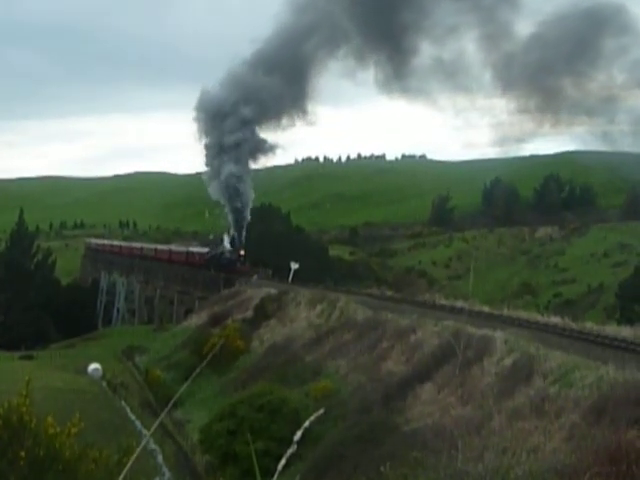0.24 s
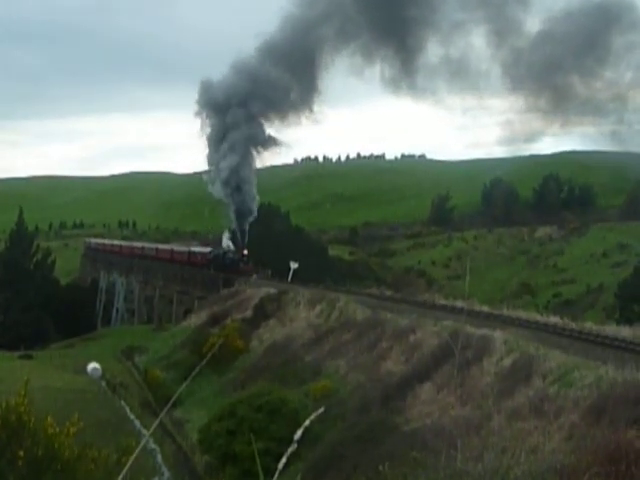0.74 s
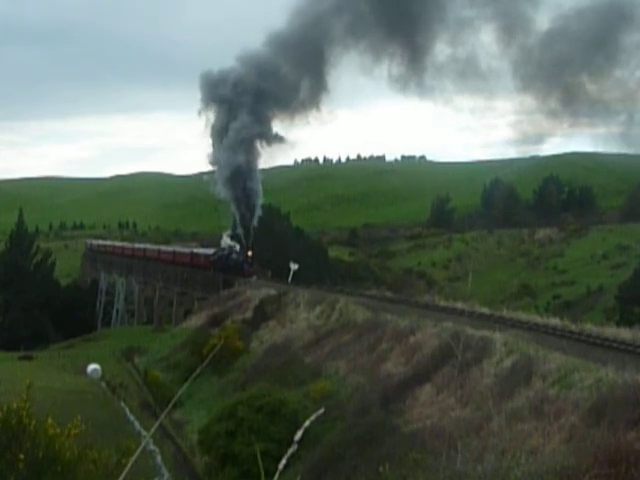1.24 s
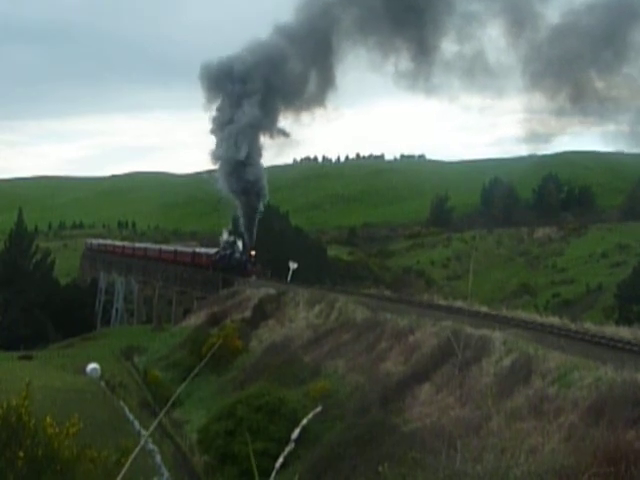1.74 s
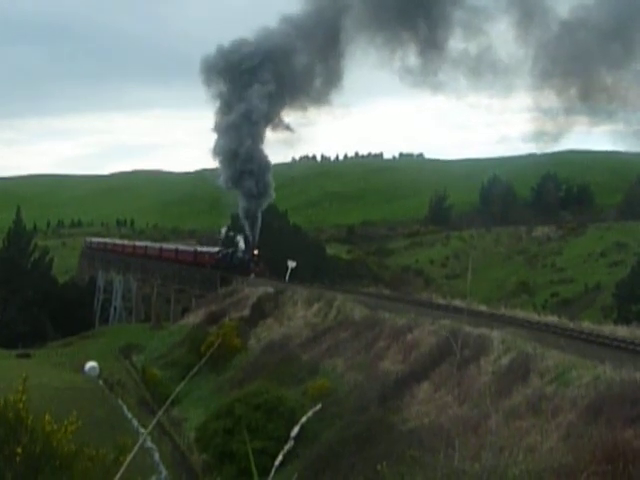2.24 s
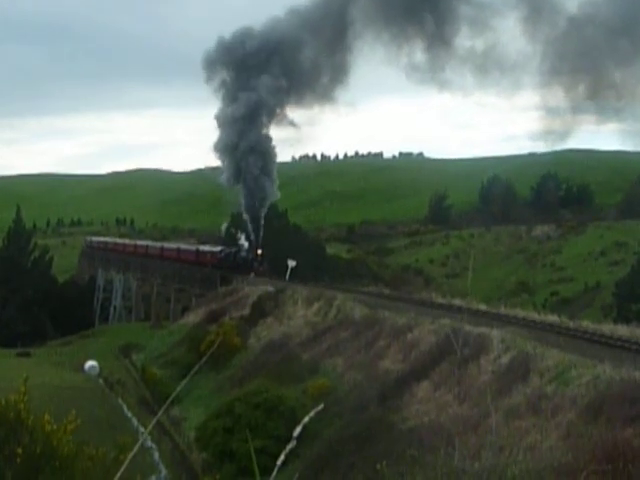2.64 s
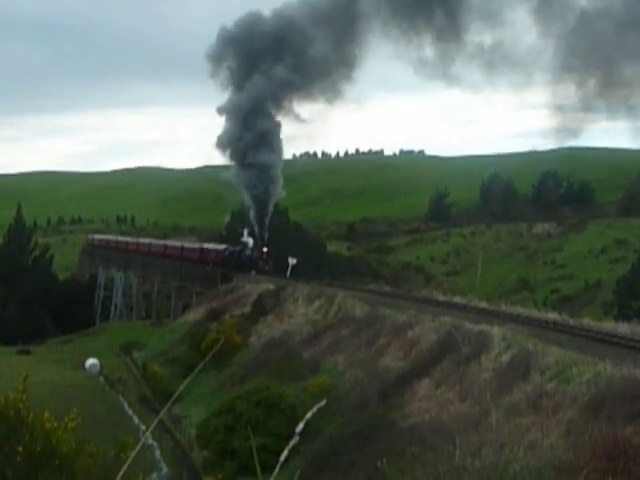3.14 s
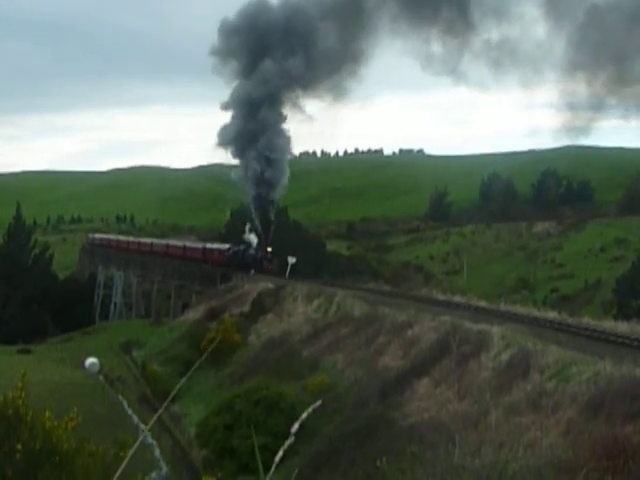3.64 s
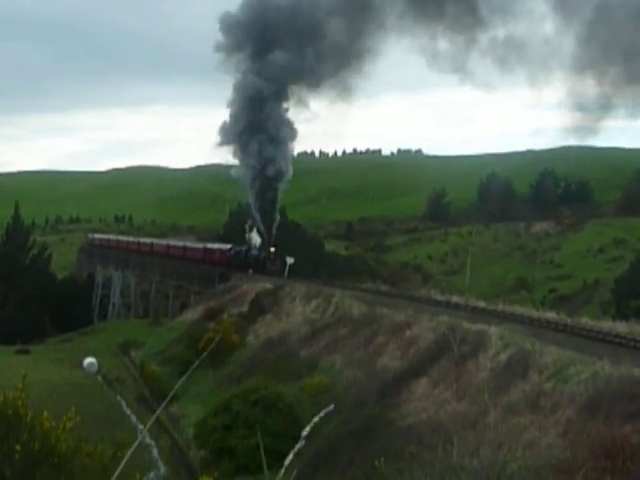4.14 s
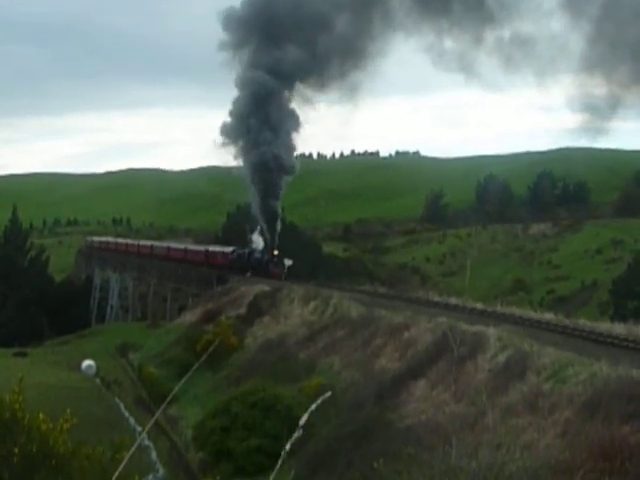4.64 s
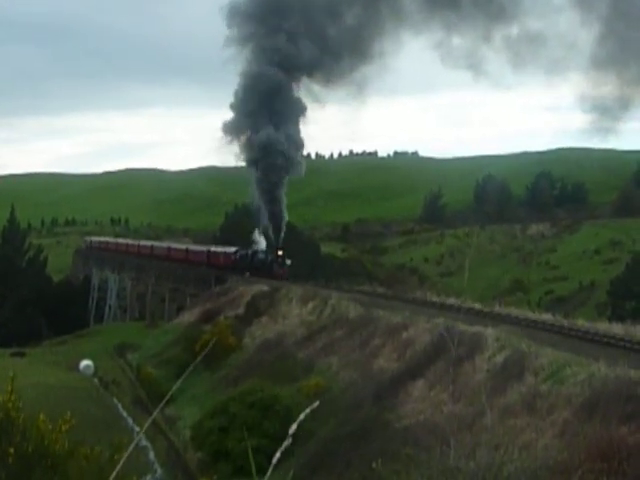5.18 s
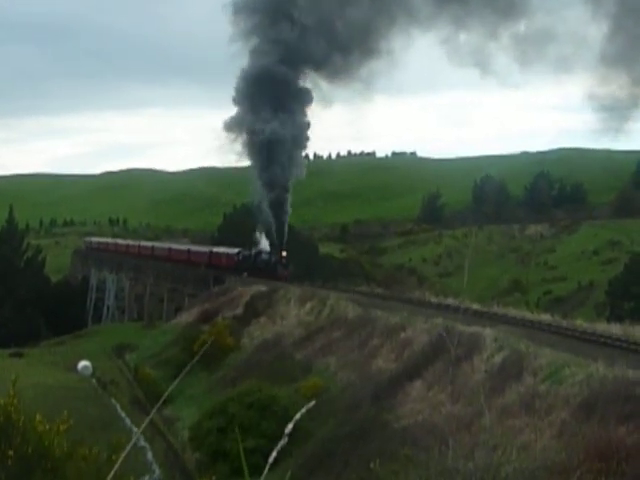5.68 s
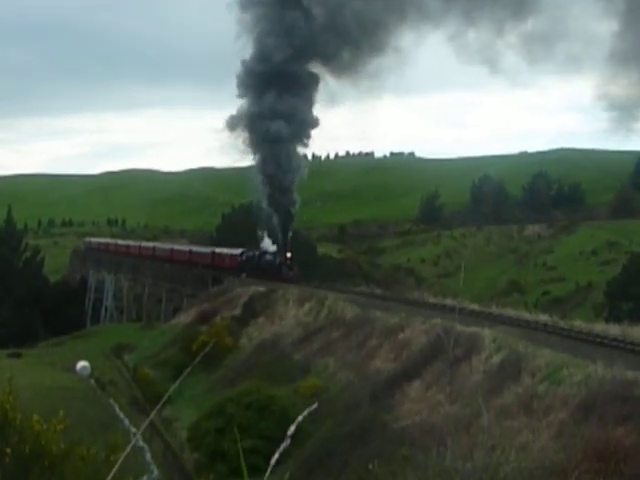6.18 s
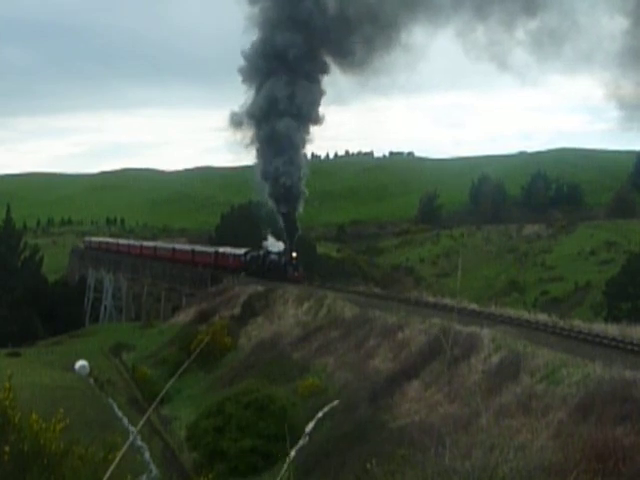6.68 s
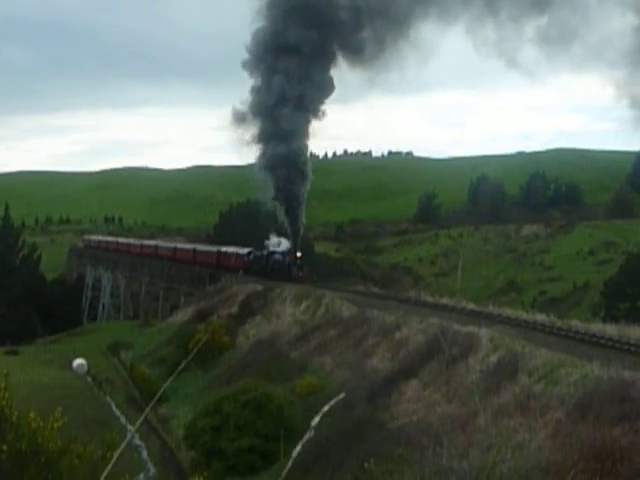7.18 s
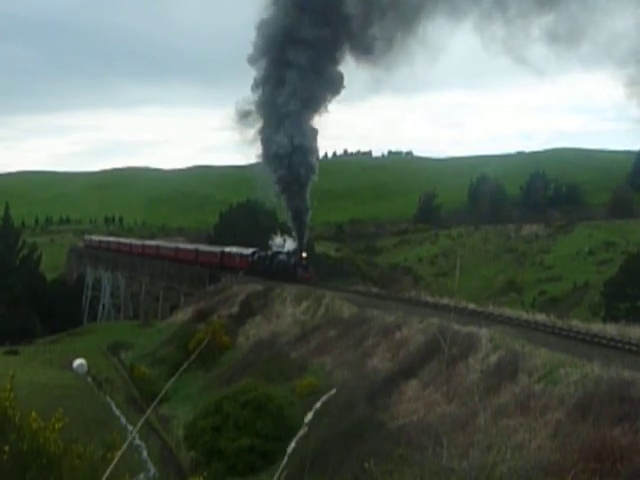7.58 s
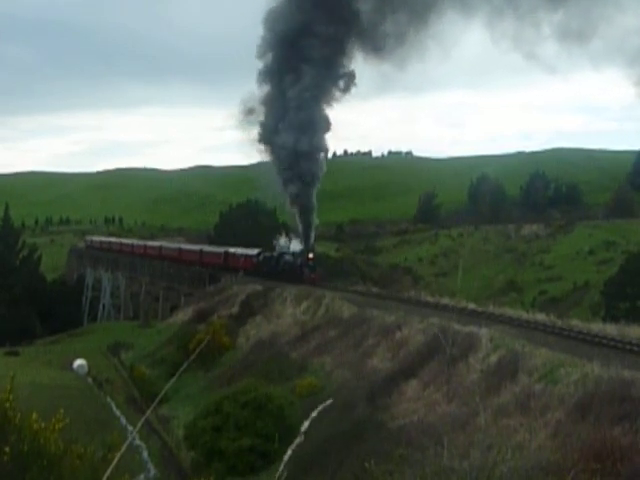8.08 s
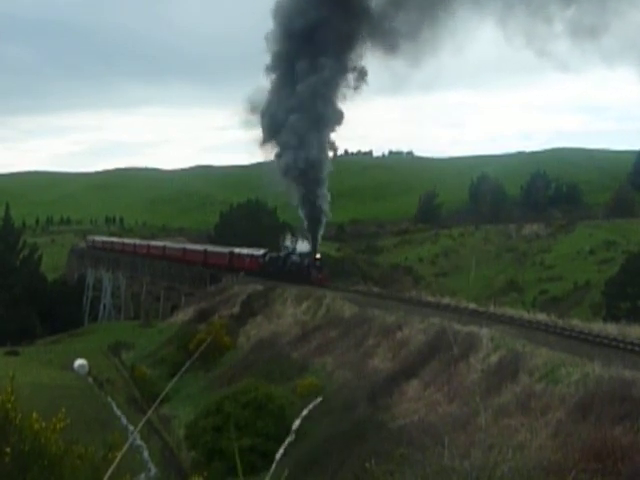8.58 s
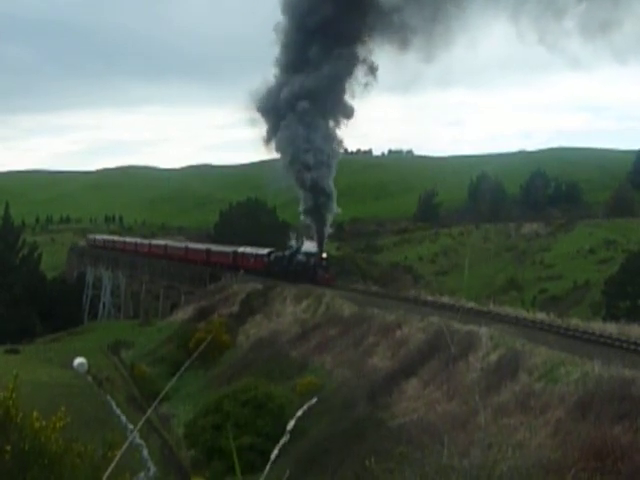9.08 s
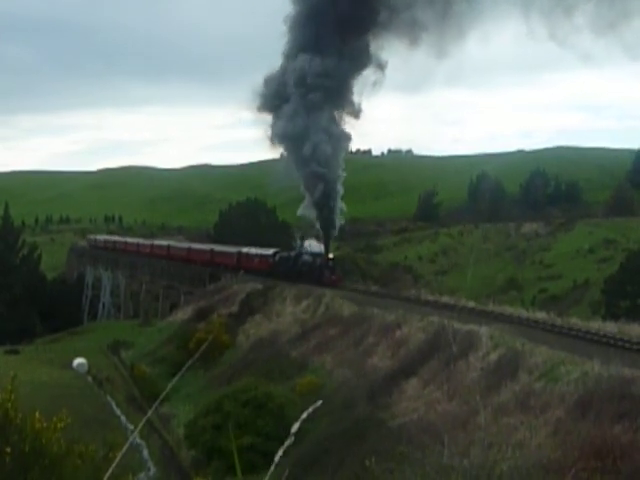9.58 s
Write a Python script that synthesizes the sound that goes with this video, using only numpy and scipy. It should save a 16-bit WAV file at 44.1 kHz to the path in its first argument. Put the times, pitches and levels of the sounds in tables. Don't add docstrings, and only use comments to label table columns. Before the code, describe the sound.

Quick, even, boomy steam exhaust beats from a train working uphill, with soft valley echo, deep wheel rumble, light hiss and a few camera ticks.

```python
import sys
import numpy as np
from scipy import signal
from scipy.fft import rfft, irfft, next_fast_len
from scipy.io import wavfile
from scipy.ndimage import uniform_filter1d

SR = 44100
rng = np.random.default_rng(int(sys.argv[2]) if len(sys.argv) > 2 else 0)


def volts(x):
    e = np.asarray(x, float) / 20
    return 10 ** e


def transcribe(signal):
    frames = np.atleast_2d(signal).T
    limited = np.clip(frames, -1, 1)
    pcm = np.round(limited * 32767).astype(np.int16)
    wavfile.write(sys.argv[1], SR, pcm)


N = 433062

# start_s, roar_db, dryness_db, valve_open_s
EXHAUST_BEATS = [(-0.015, -26, -17, .045), (.402, -28.5, -17.5, 0.079), (.842, -27.5, -27, 0.091),
                 (1.271, -30, -21, 0.085), (1.707, -30.5, -19.5, 0.088), (2.141, -28, -11.5, 0.062),
                 (2.583, -27.5, -17, 0.084), (3.004, -26, -22, 0.073), (3.436, -28.5, -21, .1),
                 (3.85, -26.5, -23.5, 0.06), (4.269, -30.5, -16.5, 0.097), (4.672, -28.5, -20, 0.074),
                 (5.086, -27.5, -17.5, 0.073), (5.474, -32, -15, 0.093), (5.88, -30.5, -16, 0.08),
                 (6.264, -29, -19.5, .085), (6.649, -29, -18, .068), (7.031, -28.5, -19.5, 0.079),
                 (7.429, -27.5, -17.5, 0.068), (7.819, -29, -11.5, 0.078), (8.224, -29, -18.5, 0.077),
                 (8.627, -30, -18.5, 0.097), (9.03, -28, -25.5, 0.081), (9.449, -27.5, -20.5, 0.074),
                 (0.193, -27.5, -19, 0.065), (.621, -27, -22.5, 0.066), (1.055, -29, -27.5, 0.07),
               (1.489, -29, -16.5, 0.097), (1.93, -29, -15.5, 0.09), (2.364, -26.5, -14.5, 0.065),
               (2.8, -25, -20, 0.073), (3.216, -29.5, -21, 0.066), (3.649, -25.5, -21, 0.08),
               (4.06, -28.5, -16, 0.053), (4.475, -26.5, -19, 0.081), (4.873, -31, -18.5, 0.09),
               (5.282, -26, -13.5, 0.057), (5.67, -31, -16.5, 0.06), (6.071, -29.5, -13.5, 0.075),
               (6.452, -28, -21, 0.085), (6.849, -28.5, -16, 0.08), (7.229, -28, -19.5, 0.085),
               (7.627, -28, -17.5, 0.086), (8.015, -29, -13, 0.079), (8.426, -29, -17.5, 0.088),
               (8.834, -28, -24.5, 0.097), (9.25, -27.5, -24.5, 0.079), (9.663, -27, -14.5, 0.073)]
STROKES = sorted(EXHAUST_BEATS)
USUAL_ROAR_DB, USUAL_DRY_DB, USUAL_OPEN_S = -28.7, -18, .078

# low_hz, high_hz, lag_s, rise_s, fall_db_per_s (after the valve shuts)
THUD = (25, 230, -.002, .018, 125)
BOOM = (236, 433, 0.0044, 0.023, 213)
ROAR = (433.5, 1684, 0.0019, 0.023, 283)
RASP = (1790, 2916, 0.0037, 0.018, 374)
HISS = (3345, 11000, 0.0015, 0.02, 400)
THUD_DB = -7
BOOM_DB, BOOM_HOLDS = 8.5, 0.87
BOOM_SAG_DB_PER_S = 30
RASP_DB, RASP_FOLLOWS = -12.5, .35

# frequency_hz, density_db (per Hz)
JET_COLOUR = [(25, -36), (60, -27.5), (125, -27), (230, -18), (310, -2), (400, -10), (560, -26.5),
              (800, -25.5), (1750, -29.5), (2050, -39), (3050, -34), (3300, -43.5), (5500, -55.5),
              (6400, -63), (7600, -70.5), (9000, -88.5)]
# frequency_hz, width_hz, gain_db (over the jet)
RESONANCES = [(48, 20, -0.5), (95.2, 12, 12.5), (151.8, 15, 9), (195, 24, 8), (272, 25, 3.5), (323, 91, 4),
              (540, 13, 1.5), (636.5, 64, 6.5), (698.4, 33, 11), (877, 18, 7), (984, 60, 7),
              (1276, 48, 6.5), (1540, 71, 2.5), (1770, 150, 1.5), (2347, 53, 6), (2918, 75, 5),
              (3630, 130, 3.5), (4216, 130, 4), (4720, 150, 3), (6020, 200, 8), (6940, 330, 5.5)]
# time_s, bend (unitless)
AIR_BEND = [(0, -1.9), (.5, -0.75), (1.5, -1.3), (2, 0.8), (2.7, -.2), (3.2, 1.1), (3.85, 2), (4.2, 0.43),
            (4.7, 1.4), (5.2, -1.5), (5.8, -1.4), (6.3, .2), (6.9, -0.18), (7.9, 0.27), (8.4, -0.94),
            (8.9, 0.81), (9.82, -.2)]
# frequency_hz, lift_db (per unit of bend)
BEND_COLOUR = [(240, 0.14), (310, 0), (420, -0.5), (700, 0.24), (1400, 0.45), (1900, -1.6), (2600, -2),
               (3800, -0.04)]
# frequency_hz, lift_db (per dB of lost dryness)
DAMP_COLOUR = [(280, -0.05), (450, 0), (800, 0.03), (1400, 0.14), (2200, 0.33)]

# frequency_hz, density_db (per Hz)
RUMBLE_COLOUR = [(15, -32.5), (25, -8.5), (49, -23), (127, -19.5), (221, -15.5), (319, -6), (565, -13.5),
                 (679, -14.5), (779, -22), (980, -16), (2040, -28.5), (2880, -31.5), (6000, -48),
                 (7800, -81.5), (13200, -120)]
RUMBLE_DB = -42.5
# peak_s, peak_db
WHEEL_SURGES = [(.11, -39), (1.94, -36), (2.76, -46.5), (4.51, -33), (4.92, -29), (6.4, -38), (6.86, -45),
                (7.44, -30), (8.48, -31.5), (8.78, -35.5), (9.78, -40)]
ROLL_DB, ROLL_DB_PER_S, SURGE_S = -51.5, 1.3, .12
# start_s, length_s, level_db
CRICKET_BOUTS = [(.05, .33, -71), (.42, 0.39, -71), (.8, 0.217, -61), (1.069, 0.54, -66), (1.65, .48, -64),
                 (2.723, .85, -70), (3.601, 0.43, -70), (4.002, .48, -70), (6.545, 0.55, -71),
                 (7.3, 0.86, -72), (8.5, 0.18, -70), (8.7, .52, -73.5), (9.354, .5, -67)]
CHORUS_DB, BOUT_EDGE_S = -83, 0.032
# pitch_hz, level_db (rms)
WHINE_TONES = [(6223, -87), (6667, -81)]
# frequency_hz, t60_s
ECHO_DECAY = [(60, 0.27), (300, 0.47), (1000, 0.41), (3000, 0.3), (8000, 0.28)]
# start_s, peak_db, ring_hz
CAMERA_TICKS = [(0.1525, -56.5, 2080), (0.3252, -47.5, 2100), (0.3562, -46, 2050), (0.372, -44.5, 2260),
                (0.397, -38.5, 2480), (1.6435, -40.5, 2000), (2.0563, -40, 2100), (2.0728, -46.5, 4250),
                (2.1144, -36.5, 2090), (4.2425, -40.5, 2170), (9.798, -45, 2050)]
# centre_s, level_db, length_s
STEAM_LEAKS = [
    (0.165, -49, 0.053),
    (1.66, -56, 0.034),
    (5.05, -58.5, 0.033),
    (6.39, -59, 0.04),
    (7.974, -52, 0.05),
    (9.015, -46.5, 0.04),
    (9.42, -52, 0.035),
    (9.802, -53, .03),
]
PUSH_DB, PUSH_S = -36, .005

# frequency_hz, density_db (per Hz)
STATIC_COLOUR = [(100, 3.5), (4000, 0), (6400, 0), (7400, -1.5), (8100, -9), (8450, -12), (8800, -31.5),
                 (9200, -51)]
STATIC_DB = -63.5
OFFSET, CEILING = .0173, .306


def evened(x):
    return x / np.sqrt(np.mean(x ** 2) + 1e-20)


def read(points, hz):
    f, value = np.transpose(points)
    return np.interp(np.log(hz + 1), np.log(f + 1), value)


def coloured(x, gain):
    size = next_fast_len(len(x))
    hz = np.fft.rfftfreq(size, 1 / SR) + 1
    return irfft(rfft(x, size) * gain(hz), size)[:len(x)]


def band(x, low_hz, high_hz):
    return coloured(x, lambda hz: 1 / (1 + (low_hz / hz) ** 16) / (1 + (hz / high_hz) ** 16))


def patchy(patchy_db, wide, long):
    a, b, patches = rng.standard_normal((N // 256 + 5, 513, 3)).T
    patches = uniform_filter1d(patches, wide, 0)
    patches = evened(uniform_filter1d(patches, long, 1))
    spectrum = (a + 1j * b) * volts(patchy_db * patches)
    return signal.istft(spectrum, nperseg=1024, noverlap=768)[1][:N]


def steadied(x, span):
    power = uniform_filter1d(uniform_filter1d(x ** 2, size=span), size=span)
    return x / np.sqrt(power)


def whistle(hz, width):
    r = np.exp(-np.pi * width / SR)
    noise = rng.standard_normal(N) + 1j * rng.standard_normal(N)
    slow = signal.lfilter([1], [1, -2 * r, r * r], noise)
    return evened((slow * np.exp(2j * np.pi * hz * np.arange(N) / SR)).real)


def pressure(level_db, lag, rise, fall_db):
    lead = 2000
    t = np.arange(-lead, 16000) / SR
    out = np.zeros(N + 40000)
    swell = 1 / (1 + np.exp(-(t - lag) / (0.27 * rise + 0.00091)))
    swell *= np.clip((t - t[0]) / .01, 0, 1)
    for (s, *_, open_s), db in zip(STROKES, level_db):
        over = np.logaddexp(0, (t - 0.71 * open_s) / 0.01) * .012
        start = round(s * SR) + lead
        out[start:start + len(t)] += swell * volts(db + 2.0 - fall_db * over)
    return out[2 * lead:][:N]


def shimmer(x):
    hz, t, z = signal.stft(x, SR, nperseg=1024, noverlap=512)
    s, _, dry_db, _ = np.transpose(STROKES)
    damp_db = USUAL_DRY_DB - np.interp(t, s + .04, dry_db)
    bend = np.interp(t, *np.transpose(AIR_BEND))
    lift_db = np.outer(read(BEND_COLOUR, hz), bend) + np.outer(read(DAMP_COLOUR, hz), damp_db)
    return signal.istft(z * volts(lift_db), nperseg=1024, noverlap=512)[1][:N]


def exhaust():
    def chimney_gain(hz):
        rings_db = sum(db / (1 + (2 * (hz - f) / width) ** 2) for f, width, db in RESONANCES)
        return volts(read(JET_COLOUR, hz) + rings_db)

    jet = coloured(patchy(2.73, wide=3, long=16), chimney_gain)
    flutter = evened(band(rng.standard_normal(N), 11, 54))
    gusts = volts(0.86 * flutter)
    _, roar_db, hiss_db, open_s = np.transpose(STROKES)
    boom_db = BOOM_DB - BOOM_HOLDS * (roar_db - USUAL_ROAR_DB)
    boom_db = boom_db - BOOM_SAG_DB_PER_S * (open_s - USUAL_OPEN_S)
    rasp_db = RASP_DB + RASP_FOLLOWS * (hiss_db - USUAL_DRY_DB)
    parts = zip((THUD, BOOM, ROAR, RASP, HISS), (THUD_DB, boom_db, 0, rasp_db, hiss_db))
    beats = np.zeros(N)
    for (low_hz, high_hz, *shape), db in parts:
        beats += steadied(band(jet, low_hz, high_hz), span=1500) * pressure(roar_db + db, *shape)
    return shimmer(gusts * beats)


def rumble():
    noise = patchy(1.6, wide=13, long=8)
    return volts(RUMBLE_DB) * evened(coloured(noise, lambda hz: volts(read(RUMBLE_COLOUR, hz))))


def wheels():
    t = np.arange(N) / SR
    roll = evened(band(rng.standard_normal(N), 49, 210))
    surges = sum(volts(db) * np.exp(-abs(t - s) / SURGE_S) for s, db in WHEEL_SURGES)
    return volts(-6.5) * (volts(ROLL_DB + ROLL_DB_PER_S * t) + surges) * roll


def crickets():
    t = np.arange(N) / SR
    song = np.full(N, volts(CHORUS_DB))
    for s, length, db in CRICKET_BOUTS:
        song += volts(db) * np.clip(np.minimum(t - s, s + length - t) / BOUT_EDGE_S, 0, 1)
    return volts(0.5) * song * steadied(whistle(4247, width=25), span=600)


def camera_whine():
    return sum(volts(db) * whistle(hz, width=4.) for hz, db in WHINE_TONES)


def hills(x):
    taps = np.zeros((2, SR // 2))
    at = np.arange(1300, SR // 2 - 20, 20)
    places = at + rng.integers(0, 20, (2, len(at)))
    np.put_along_axis(taps, places, rng.choice([-1., 1.], (2, len(at))), 1)
    hz, t, z = signal.stft(taps, SR, nperseg=256)
    t60_s = np.maximum(read(ECHO_DECAY, hz), .05)[:, None]
    tails = signal.istft(z * volts(-60 * t / t60_s), SR, nperseg=256)[1]
    turn = 2 * np.pi * .9 * np.arange(N) / SR
    fed = x * np.array([np.cos(turn), np.sin(turn)])
    return signal.oaconvolve(fed, tails / np.linalg.norm(tails[0]), axes=1).sum(0)[:N]


def camera_ticks():
    out = np.zeros(N)
    t = np.arange(600) / SR
    for s, db, hz in CAMERA_TICKS:
        snap = rng.standard_normal(len(t))
        tick = volts(db - 60 * t / .022) * (.7 * snap + .5 * np.sin(2 * np.pi * hz * t))
        out[round(s * SR):][:len(t)] += tick
    return out


def wisps():
    t = np.arange(N) / SR
    flow = sum(volts(db) * np.exp(-((t - s) / (.5 * length)) ** 4) for s, db, length in STEAM_LEAKS)
    return flow * evened(band(rng.standard_normal(N), 1200, 3200))


def pushes():
    u = np.arange(-1500, 1501) / SR / PUSH_S
    starts = np.zeros(N)
    for s, roar_db, *_ in STROKES[1:]:
        starts[round((s + .003) * SR)] = volts(PUSH_DB + .4 * (roar_db + 26.5))
    return signal.oaconvolve(starts, (u ** 2 - 1) * np.exp(-u ** 2 / 2), "same")


def scene():
    beats = exhaust()
    train = beats + rumble() + wheels() + wisps() + pushes()
    surroundings = crickets() + camera_whine() + volts(-14.0) * hills(beats) + camera_ticks()
    return (train + surroundings)[None]


def low_pass(x):
    return signal.sosfilt(signal.butter(12, 8460, fs=SR, output="sos"), x)


def record(dry):
    saturated = dry[0] / (1 + (dry[0] / CEILING) ** 12) ** (1 / 12)
    limited = coloured(saturated, lambda hz: 1 / (1 + (hz / 7700) ** 12))
    noise = coloured(rng.standard_normal(N), lambda hz: volts(read(STATIC_COLOUR, hz)))
    static = volts(STATIC_DB) * evened(noise)
    return low_pass((limited + static + OFFSET)[None])


dry = scene()
out = record(dry)
transcribe(out)
```